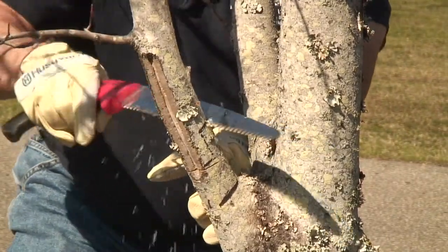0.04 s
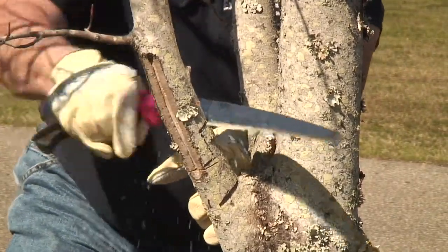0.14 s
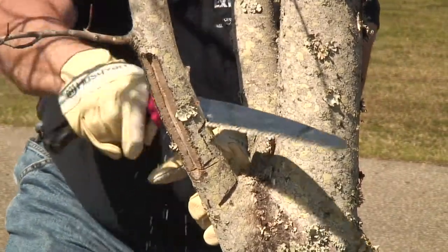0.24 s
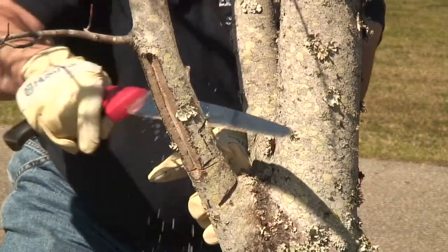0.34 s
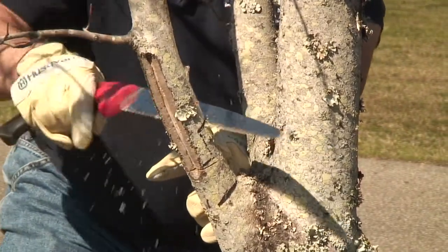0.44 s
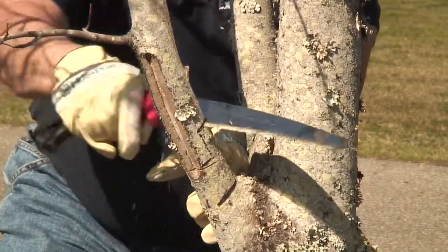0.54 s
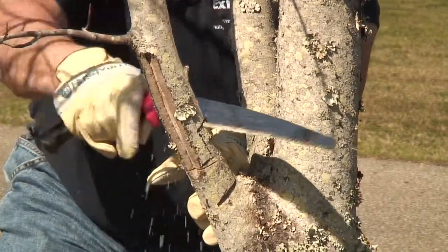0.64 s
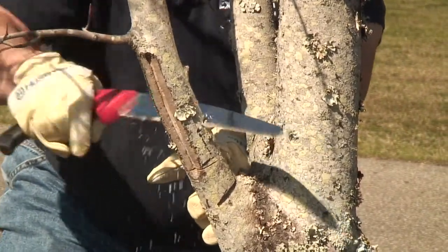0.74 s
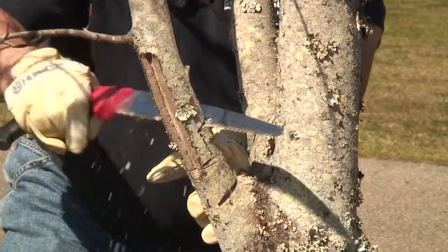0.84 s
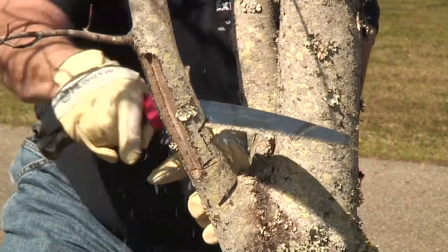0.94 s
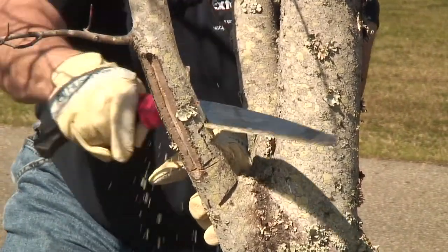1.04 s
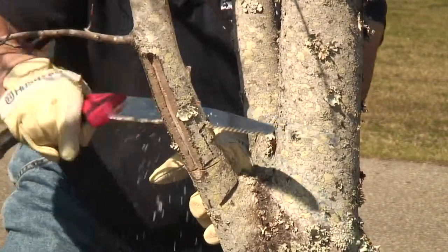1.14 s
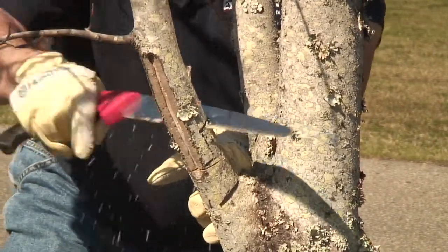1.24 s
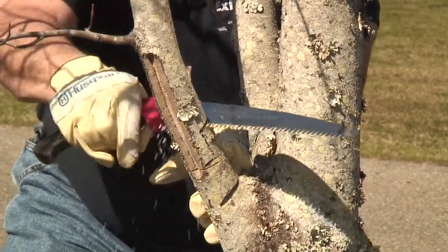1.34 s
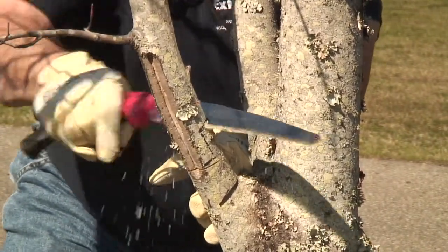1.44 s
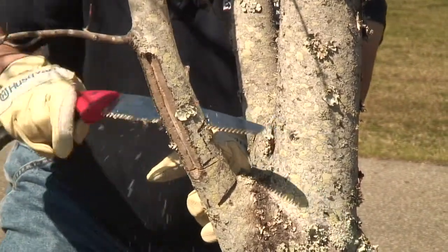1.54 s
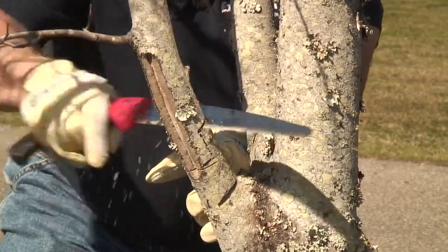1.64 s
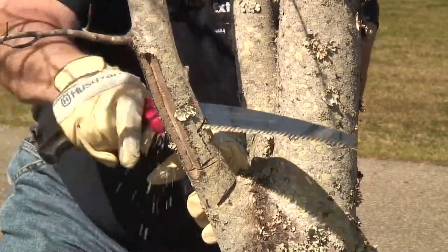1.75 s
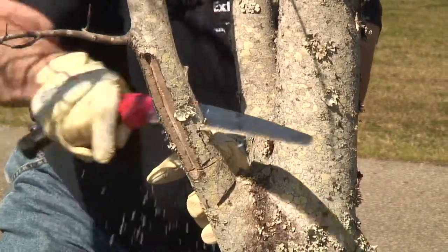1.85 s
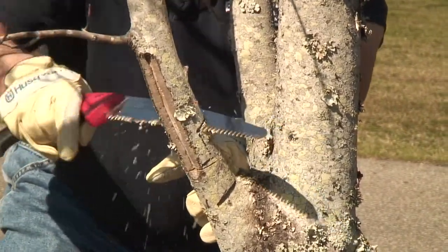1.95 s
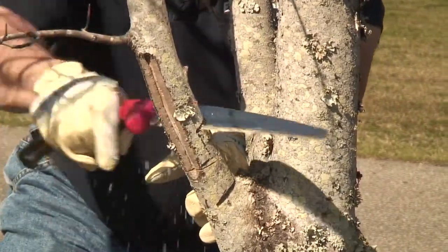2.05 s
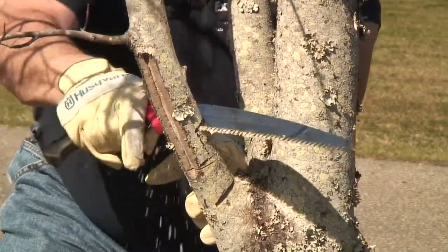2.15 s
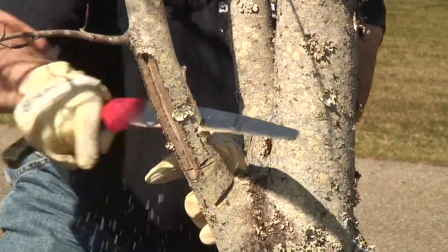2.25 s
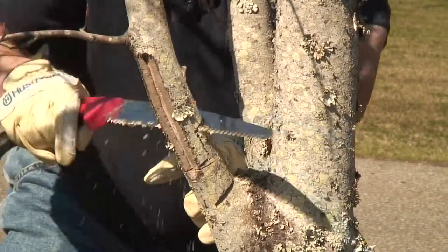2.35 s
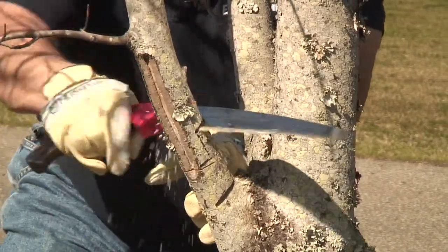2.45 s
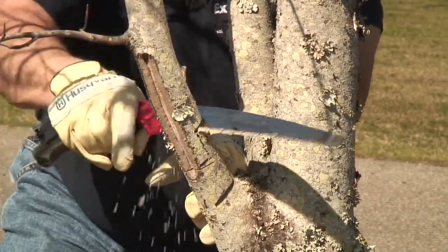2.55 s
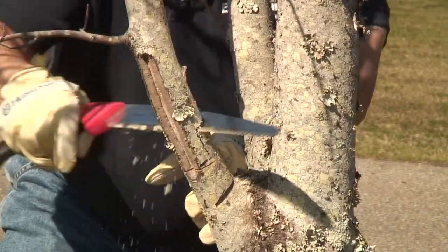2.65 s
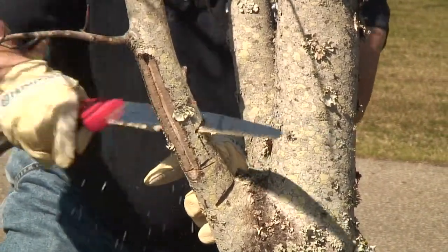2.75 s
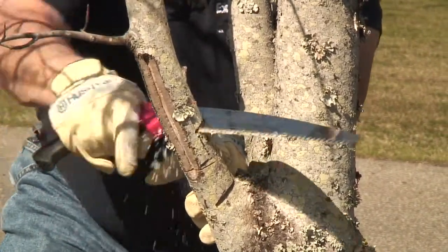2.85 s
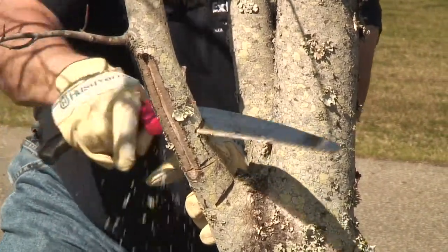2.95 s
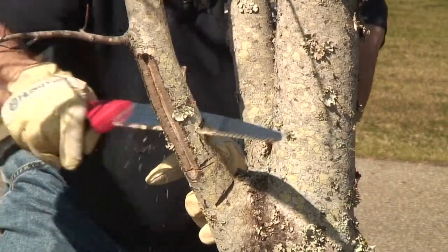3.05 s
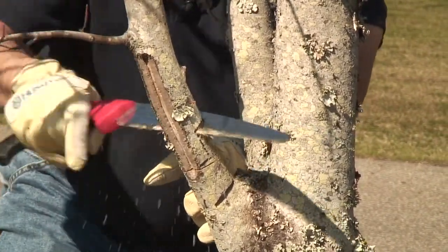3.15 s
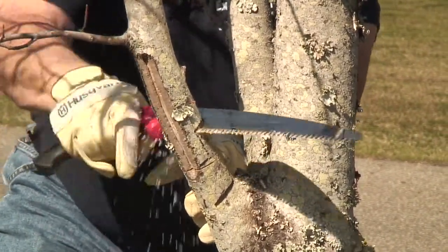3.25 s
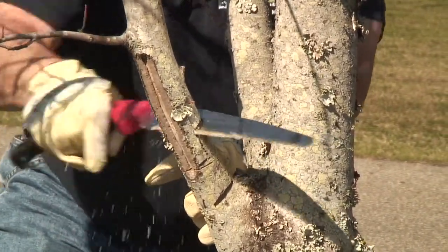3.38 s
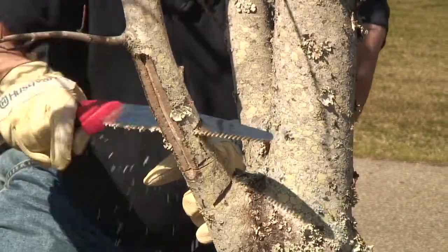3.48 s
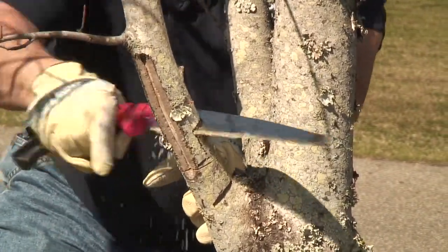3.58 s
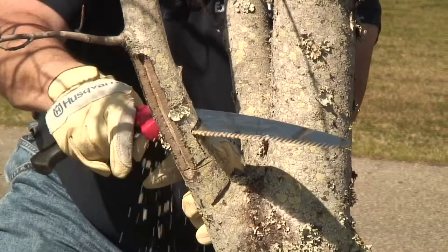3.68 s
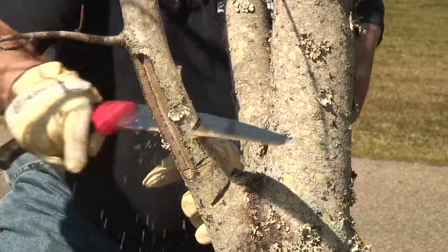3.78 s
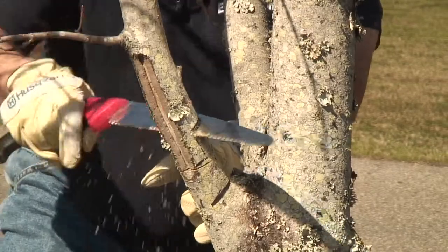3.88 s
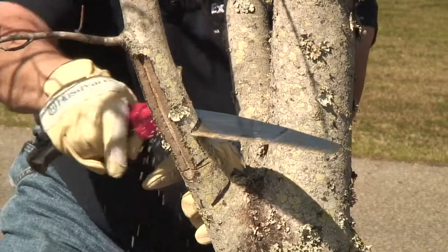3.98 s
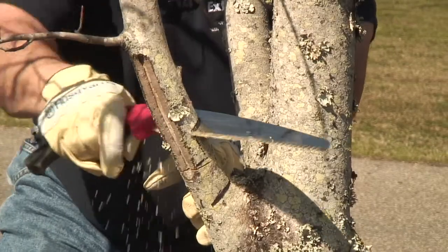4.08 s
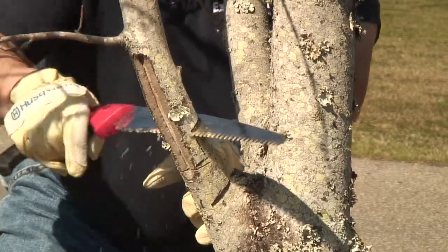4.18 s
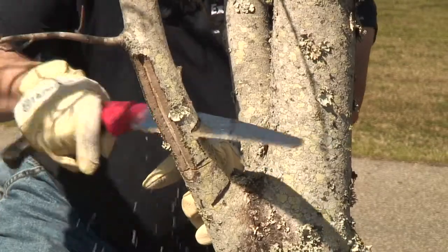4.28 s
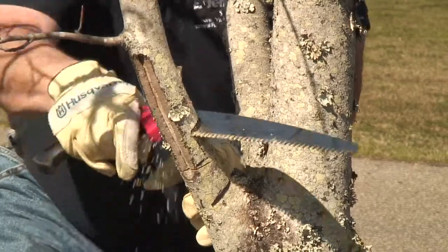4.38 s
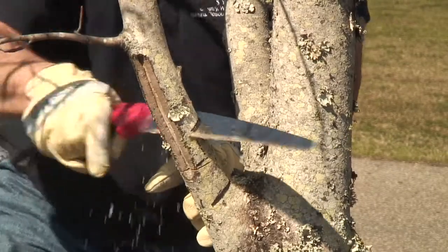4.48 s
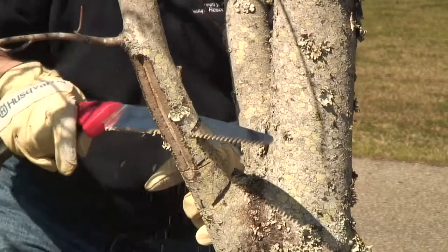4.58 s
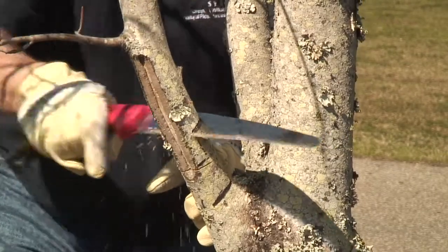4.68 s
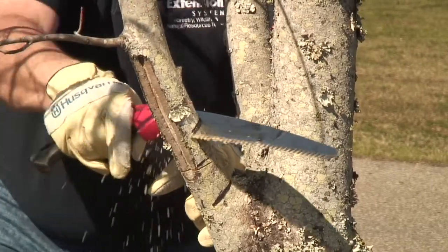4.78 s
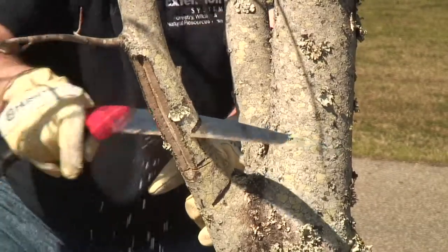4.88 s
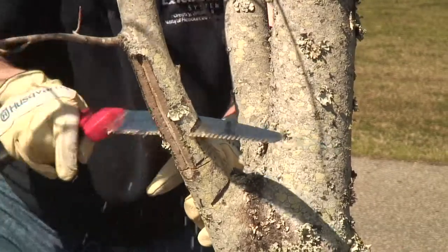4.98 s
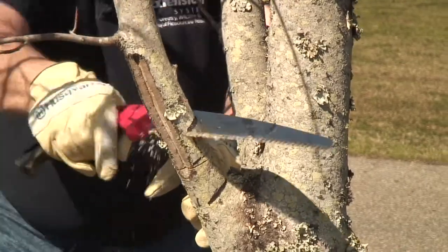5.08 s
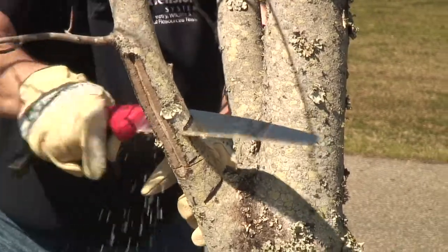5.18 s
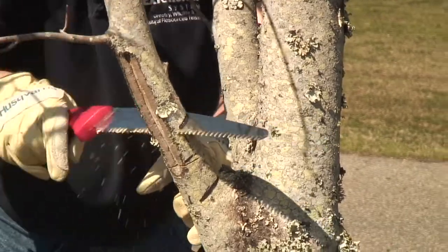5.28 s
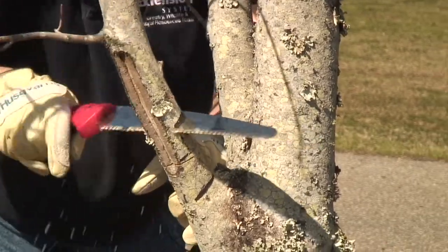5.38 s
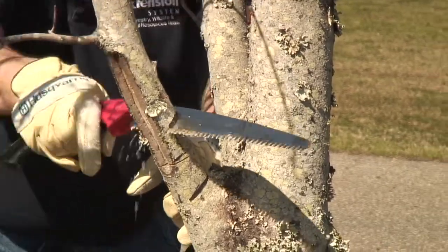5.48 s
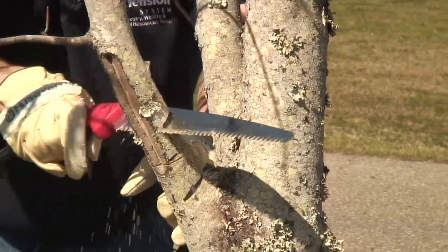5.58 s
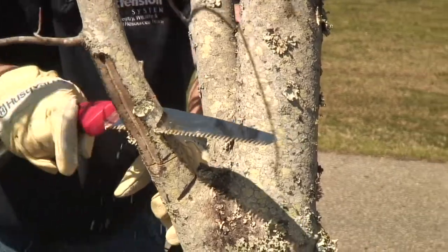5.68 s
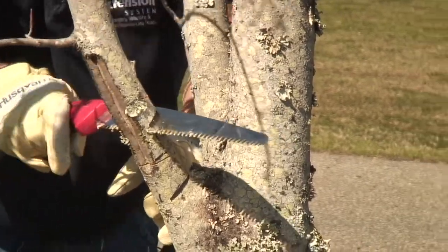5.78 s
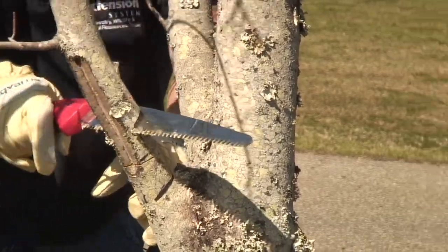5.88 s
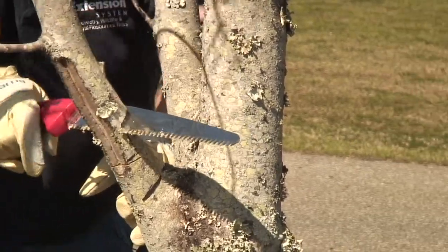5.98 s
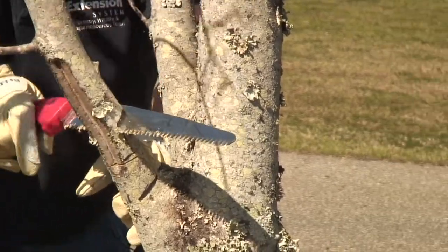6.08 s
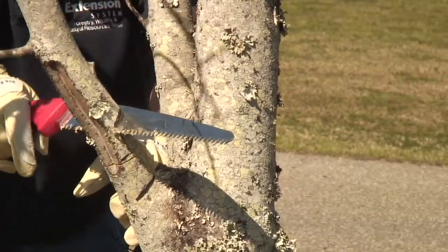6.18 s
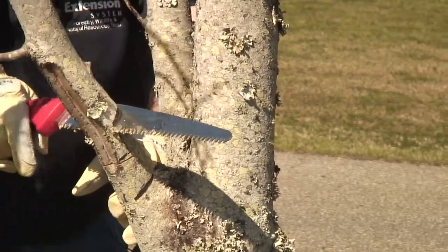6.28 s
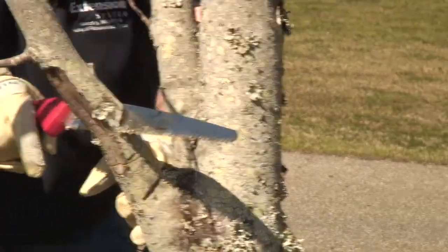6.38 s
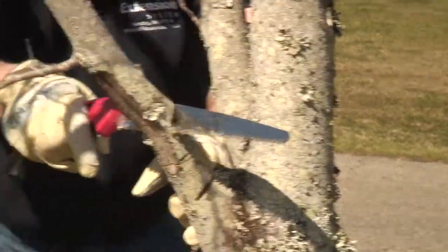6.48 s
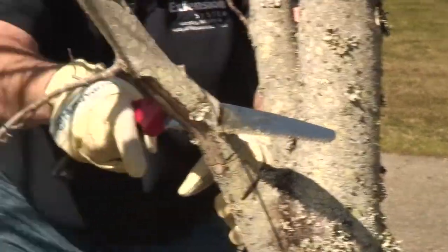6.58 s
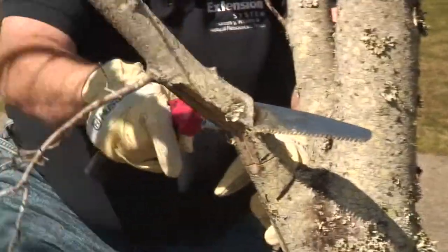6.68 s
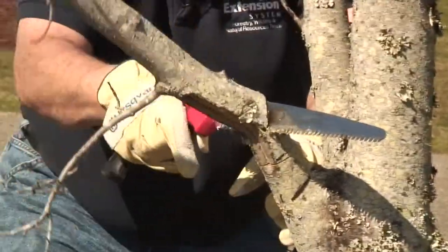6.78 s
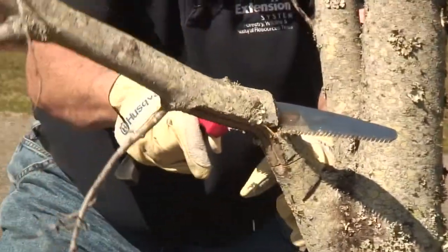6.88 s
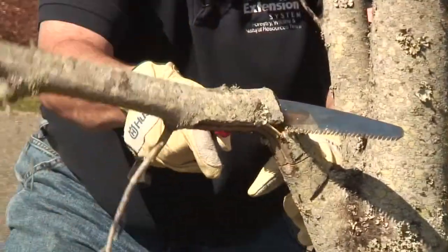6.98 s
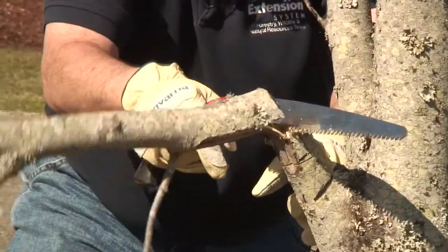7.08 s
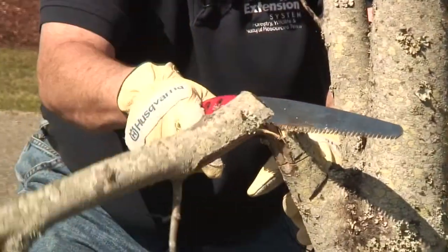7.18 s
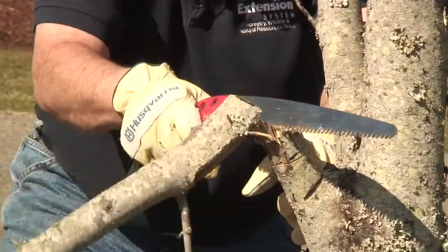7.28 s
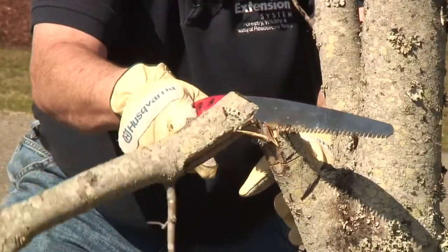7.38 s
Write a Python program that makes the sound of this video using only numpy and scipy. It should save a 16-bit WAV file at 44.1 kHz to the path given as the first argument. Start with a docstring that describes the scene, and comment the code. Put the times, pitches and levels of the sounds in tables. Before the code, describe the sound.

A pruning saw cuts through a live branch outdoors, close to the microphone. Quick, even strokes alternate between louder pulls and lighter pushes, mixing a hollow wooden buzz with a bright steel rasp and a few short whistles and squeaks. The sawing stops. After a brief pause, fibres snap sharply one after another, the wood crackles as it tears, and twigs rustle as the limb drops. Faint open air lies underneath.

```python
"""A pruning saw cuts a live branch close by, outdoors: loud pull strokes, lighter pushes.
Its teeth drum on the wood and rasp the steel blade, which rings, whistles and snags in the kerf.
After a pause the last thick fibres snap one by one, the hinge of uncut wood crackles as it tears,
and the limb swings down with a rustle. Quiet open air lies under it all."""
import sys
import numpy as np
from scipy import signal
from scipy.fft import rfft, irfft, next_fast_len
from scipy.io import wavfile
from scipy.ndimage import uniform_filter1d

SR = 44100
rng = np.random.default_rng(int(sys.argv[2]) if len(sys.argv) > 2 else 0)


def bounce(signal):
    """Save signal as a 16-bit WAV file at the path given by the first command-line argument."""
    frames = np.transpose(np.atleast_2d(signal))
    limited = np.clip(frames, -1, 1)
    pcm = np.round(limited * 32767).astype(np.int16)
    wavfile.write(sys.argv[1], SR, pcm)


N = 327663
T = np.arange(N) / SR
TOP_HZ = 15900


def undb(db):
    """Decibels to gain."""
    return 10 ** (np.asarray(db) / 20)


def unit(x):
    """Scale to rms 1."""
    return x / np.sqrt(np.mean(x ** 2))


def noise():
    """White noise of full length."""
    return rng.standard_normal(N)


def colour(x, points):
    """EQ by a curve of (frequency [Hz], level [dB]) points; rms 1."""
    hz, db = np.transpose(points)
    half = next_fast_len(N // 2 + 1)
    gain = undb(np.interp(np.log(np.linspace(1, SR / 2, half + 1)), np.log(hz), db))
    return unit(irfft(rfft(x, 2 * half) * gain)[:N])


def lowpass(x, hz, order=1):
    """Roll off the highs."""
    return signal.sosfilt(signal.butter(order, hz, fs=SR, output="sos"), x)


def ring(x, hz, width_hz):
    """One resonance, gain 1 at its centre."""
    return signal.lfilter(*signal.iirpeak(hz, hz / width_hz, fs=SR), x)


def bell_eq(x, hz, width_hz, db):
    """Boost or cut one resonance by a level that may move."""
    return x + (undb(db) - 1) * ring(x, hz, width_hz)


def sing(hz, half_width_hz, drive):
    """A driven resonance whose centre may drift: narrow noise riding a pitch curve."""
    quiver = lowpass((noise() + 1j * noise()) * drive, half_width_hz, order=2)
    return unit(np.real(quiver * np.exp(2j * np.pi * np.cumsum(hz) / SR)))


def walk(rate):
    """Random levels held 1 / rate s and slewed; rms 1."""
    hold = int(SR / rate)
    return unit(uniform_filter1d(noise()[np.arange(N) // hold], hold))


def arch(start, top, end):
    """A half-sine swell that peaks at the given time."""
    return np.sin(np.pi * np.interp(T, [start, top, end], [0, .5, 1])).clip(0)


# pull and push in turn, each lasting until the next: (start [s], fastest point [share], force [dB])
HAND_STROKES = [(-.046, 0.44, -35.5), (.104, 0.59, -36), (.283, 0.69, -33.5), (.492, 0.57, -38),
                (.673, 0.58, -34), (.885, 0.59, -37.5), (1.068, 0.56, -33), (1.267, 0.6, -37),
                (1.442, 0.67, -33), (1.642, 0.58, -36.5), (1.824, 0.66, -34.5), (2.036, 0.56, -37),
                (2.207, 0.55, -34.5), (2.418, 0.44, -37.5), (2.586, 0.63, -34.5), (2.784, 0.46, -38),
                (2.978, 0.69, -33.5), (3.181, 0.53, -37.5), (3.358, 0.66, -33.5), (3.563, 0.53, -37),
                (3.739, 0.63, -34.5), (3.925, .64, -39), (4.106, 0.51, -37.5), (4.313, 0.51, -37.5),
                (4.48, .4, -31.5), (4.678, 0.57, -37), (4.834, 0.58, -33), (5.025, 0.68, -38),
                (5.207, .53, -33.5), (5.392, 0.74, -40.5), (5.581, 0.45, -47.5)]
def hand(pulling, stop_s=5.741):
    """Strokes in one direction: speed, progress through the stroke, and envelopes for wood and steel."""
    grip, power = (.29, 1.25) if pulling else (.13, 1.48)
    speed, place, bite, rasp = np.zeros((4, N))
    ends = [row[0] for row in HAND_STROKES[1:]] + [stop_s]
    strokes = list(zip(HAND_STROKES, ends, rng.standard_normal(len(ends))))
    for (start, fastest, force_db), end, haste in strokes[0::2] if pulling else strokes[1::2]:
        swing = arch(start, start + fastest * (end - start), end)
        speed += swing * undb(1.4 * haste)
        place += np.interp(T, [start, end], [0, 1], right=0)
        bite += undb(force_db) * swing ** 1.4
        # the teeth skate at low speed and dig in past the grip threshold
        dig = .2 + .8 * swing ** 6 / (swing ** 6 + grip ** 6)
        rasp += undb(force_db) * swing ** power * dig
    return speed, place, bite, rasp


def teeth(pulling, speed, scatter_db=2.5):
    """Each tooth knocks and tears a burst of fibres: ragged on the pull, an even buzz on the push."""
    tooth_hz, jitter = (279.2, .06) if pulling else (357.5, .04)
    passed = np.cumsum(tooth_hz * speed ** .4 * (1 + jitter * walk(300))) / SR
    tooth, phase = passed.astype(int), passed % 1
    pulses = np.diff(tooth, prepend=0) * undb(scatter_db * noise()[tooth])
    toughness = undb(2 * walk(300))
    tearing = 1 + 1.1 * np.exp(-phase / 1.15) * toughness
    return pulses, tearing


def flex(x, place, near_ms, travel_ms, echo):
    """A bending wave returns from the blade's end; its delay follows the free length of steel."""
    delay_s = (near_ms + travel_ms * place) * (1 + .15 * walk(4)) / 1000
    return unit(x + echo * np.interp(T - delay_s, T, x))


# body of the branch under pulled and pushed teeth: (frequency [Hz], level [dB])
PULL_BODY = [(130, -41), (290, -15), (450, -9), (620, -0.5), (800, 3.5), (1100, 0), (1350, -4.5),
             (1700, -9.5), (2300, -8.5), (3200, -21.5)]
PUSH_BODY = [(130, -35), (320, -9.5), (450, -6), (640, -1), (850, -2), (1090, 5), (1400, -2), (1800, -4.5),
             (2300, -15), (3200, -24)]
def branch(pulling, speed, place, pulses, tearing):
    """The wood drums under the teeth, with a groan, a low knock and a hollow note."""
    body, tooth_db, groan_hz, groan_db = (PULL_BODY, -1, 790, -8) if pulling else (PUSH_BODY, 1, 1071, -6)
    drumming = colour(pulses, body) * np.sqrt(np.mean(speed > .1))
    wood = undb(tooth_db) * drumming + colour(noise() * tearing, body)
    wood = flex(wood, place, near_ms=2, travel_ms=1, echo=.25)
    # drawing the blade out sinks the groan's pitch and brings up the knock
    drawn = place - .5 if pulling else .5 - place
    groan = sing(groan_hz - 260 * drawn + 45 * walk(6), half_width_hz=54, drive=tearing)
    knock_db = 18 * drawn
    # groan and hollow note fade as the kerf deepens
    wood += undb(groan_db - .5 * T) * groan
    hollow_db = 2.5 - T - 4.5 * drawn
    wood = bell_eq(wood, hz=310, width_hz=105, db=knock_db)
    return bell_eq(wood, hz=1330, width_hz=540, db=hollow_db)


# rasp of steel in the kerf: (frequency [Hz], level [dB])
STEEL_RASP = [(1500, -18), (2600, -2.5), (3300, 1), (4200, -2.5), (5300, 2.5), (6500, -6.5), (7400, -6),
              (8800, 0.5), (10400, -1), (11500, -9), (13000, -9), (15500, -26)]
def blade(pulling, speed, place, tearing, ring_hz, ring_db, sheen_db):
    """The steel scrapes and rings as the kerf pinches it; a looser sheen on top grows with speed."""
    pinch, sheen_trim_db, tilt_db_per_octave = (1.2, -6.5, 1) if pulling else (.12, -16, -1)
    ringing = sing(ring_hz + 55 * walk(12), half_width_hz=302, drive=tearing)
    ringing *= undb(1 + pinch * ring_db)
    sheen = sing(10100 + 350 * walk(7), half_width_hz=850, drive=tearing)
    sheen *= speed * undb(sheen_db + sheen_trim_db + .5 * walk(12))
    tilted = [(hz, db + tilt_db_per_octave * np.log2(hz / 6000)) for hz, db in STEEL_RASP]
    scrape = colour(noise() * tearing, tilted)
    return flex(scrape + ringing + sheen, place, near_ms=.6, travel_ms=.5, echo=.3)


# as the kerf deepens the blade's ring sinks, its sheen swells and ebbs, and the wood finally eases off:
# (time [s], ring pitch [Hz], ring level [dB], sheen level [dB], wood level [dB])
KERF_CURVES = [(0, 6295, 1, -5, -2), (1.299, 6210, -1.5, -6, 0), (2.3, 6280, -3.5, 3, 1),
               (3.3, 6227, -.5, 2, 0.5), (4.2, 6220, 2, 8, 0.5), (4.599, 6140, 1, 2.5, -1),
               (5.299, 6070, 0.5, 1, -1.5), (5.698, 6000, 1, -8, -4)]
def saw(pulling):
    """All pulls or all pushes: the hand drives the teeth, and the teeth excite wood and steel."""
    wood_trim_db, steel_trim_db, catch_db = (-4, 0, .78) if pulling else (-3, .25, .83)
    times, *curves = np.transpose(KERF_CURVES)
    ring_hz, ring_db, sheen_db, wood_db = (np.interp(T, times, curve) for curve in curves)
    speed, place, bite, rasp = hand(pulling)
    pulses, tearing = teeth(pulling, speed)
    wood = branch(pulling, speed, place, pulses, tearing)
    steel = blade(pulling, speed, place, tearing, ring_hz, ring_db, sheen_db)
    catching = undb(catch_db * walk(85))  # the teeth catch and slip unevenly
    wood *= bite * undb(wood_trim_db + wood_db + .58 * walk(70))
    steel *= rasp * undb(steel_trim_db + .4 * walk(160))
    return catching * (wood + steel)


# outdoor bed: (frequency [Hz], level [dB])
AIR_BED = [(20, 3), (45, -7.5), (110, -11), (230, -8), (320, -5.5), (430, -5.5), (800, -2), (1300, -8),
           (2000, -11.5), (3500, -12), (7000, -15), (11000, -17.5), (15000, -23)]
def air(level_db=-53.5):
    """Steady open air with a little low rumble."""
    return colour(noise(), AIR_BED) * undb(level_db + .11 * walk(2.9))


# whistles of the blade: (middle [s], top pitch [Hz], level [dB])
BLADE_WHISTLES = [(.29, 1450, -43), (1.19, 1470, -42), (1.675, 1512, -43), (2.085, 1470, -43),
                  (2.606, 1404, -43.5)]
def whistles(length_s=.15, droop_hz=270, waver=.0061):
    """The sliding blade sings near-pure tones, each rising and falling in one arch."""
    out, wobble = np.zeros(N), 1 + waver * walk(250)
    for middle, top_hz, db in BLADE_WHISTLES:
        along = np.clip(2 * (T - middle) / length_s, -1, 1)
        hz = (top_hz - droop_hz * along ** 2) * wobble
        out += undb(db) * (1 - along ** 4) * np.sin(2 * np.pi * np.cumsum(hz) / SR)
    return out * undb(2.3 * walk(90))


# snags and creaks in the kerf: (middle [s], length [s], pitch [Hz], level [dB])
KERF_CREAKS = [(0.685, 0.11, 2750, -53), (1.341, 0.027, 700, -37.5), (2.028, 0.047, 1730, -51),
               (3.231, 0.054, 310, -46), (3.239, 0.037, 577, -41), (3.267, 0.066, 1270, -37.5),
               (4.47, 0.045, 2220, -41), (5.029, 0.074, 1880, -45.5), (5.29, .11, 3470, -45),
               (5.316, 0.039, 780, -37), (7.24, .011, 3140, -43), (7.405, 0.029, 3220, -41.5)]
def creaks(width_share=.37, scuff_db=-11):
    """Short hoarse squeaks and grunts of the pinched blade and the bending wood, each with a dry scuff."""
    out, scuff = np.zeros(N), undb(scuff_db) * colour(noise(), STEEL_RASP)
    for middle, length, hz, db in KERF_CREAKS:
        width_hz = width_share * hz
        squeak = unit(ring(ring(noise(), hz, width_hz), hz, width_hz))
        out += undb(db) * arch(middle - length / 2, middle, middle + length / 2) * (squeak + scuff)
    return out


# thin tones, barely above the air: (start [s], end [s], pitch [Hz], level [dB])
THIN_TONES = [(6.02, 6.3, 2460, -70), (6.37, 6.51, 2460, -66), (6.978, 7.04, 6850, -56)]
def faint_tones(half_width_hz=18):
    """Thin whistles swell and fade at a steady pitch."""
    return sum(undb(db) * arch(start, (start + end) / 2, end) * sing(np.full(N, hz), half_width_hz, 1)
               for start, end, hz, db in THIN_TONES)


# resonances of split wood: (frequency [Hz], width [Hz], level [dB])
SPLINTER_MODES = [(440, 200, -14.5), (1400, 530, -12.5), (2720, 79, -22), (3920, 530, 7), (5740, 1200, 1.5),
                  (6660, 640, 3.5), (9000, 1200, 4.5), (10930, 840, -0.5), (11800, 2000, -16)]
def splinter(x):
    """The split wood rings in answer to a fracture."""
    return sum(undb(db) * ring(x, hz, width_hz) for hz, width_hz, db in SPLINTER_MODES)


# thick fibres breaking: (time [s], level before trim [dB], strongest frequency [Hz])
FIBRE_SNAPS = [(6.3603, -46.5, 3870), (6.4993, -20, 3300), (6.5746, -36, 3670), (6.5996, -39, 3980),
               (6.614, -25, 3700), (6.6347, -12, 9800), (6.687, -41.5, 5760), (6.7426, -38.5, 10100),
               (6.8897, -19, 9600), (6.9385, -25, 9100), (7.0829, -31, 3830), (7.0915, -14.5, 8600),
               (7.1023, -33.5, 3850), (7.155, -38.5, 9190), (7.1872, -34, 6810), (7.204, -36, 6760),
               (7.2258, -40, 3330), (7.2695, -24, 6280), (7.313, -37, 3820), (7.3352, -29, 5800),
               (7.358, -35, 4190)]
def snaps(tear_s=.001, tail_s=.0083, tail_db=-27, air_s=.033, air_db=-46, trim_db=3):
    """Each fibre parts in about a millisecond; the limb and the ground scatter a faint tail."""
    out, t = np.zeros(N), T[:SR // 10]
    fade = np.exp(-t / tear_s) + undb(tail_db) * np.exp(-t / tail_s) + undb(air_db) * np.exp(-t / air_s)
    for time, db, hz in FIBRE_SNAPS:
        grain = np.sign(rng.standard_normal(len(t)))
        crack = splinter(grain * fade)
        # every fibre has a pitch of its own, and thick low ones part more dully
        crack += undb(1) * ring(crack, hz, width_hz=.49 * hz)
        crack = lowpass(crack, min(1.52 * hz, TOP_HZ))
        loudest = np.sqrt(uniform_filter1d(crack ** 2, SR // 500).max())
        i = int(time * SR)
        out[i:i + len(t)] += undb(db + trim_db) * crack[:N - i] / loudest
    return out


# spells of tearing as the limb bends: (start [s], peak [s], end [s], level [dB])
HINGE_TEARS = [(6.52, 6.66, 7.4, -57), (6.77, 6.787, 7.0, -54.5), (7.06, 7.25, 8, -55.5)]
def hinge(ticks_per_s=330, scatter_db=7):
    """Small fibres tick at random in the hinge of uncut wood while it tears."""
    strain = sum(undb(db) * arch(start, peak, end) for start, peak, end, db in HINGE_TEARS)
    ticks = (rng.random(N) < ticks_per_s / SR) * undb(scatter_db * noise().clip(-2, 2))
    crackle = splinter(ticks) + undb(7) * ring(ticks, hz=3750, width_hz=600)
    return strain * unit(lowpass(crackle, hz=11000))


# rustle of twigs: (frequency [Hz], level [dB])
TWIG_RUSTLE = [(800, -24), (2000, -6), (3200, 3.5), (4200, 1), (6000, -1), (9000, -4), (12000, -11),
               (15500, -29)]
# swishes of the falling limb: (time [s], rustle level [dB], brush level [dB])
LIMB_SWISHES = [(7.258, -47, -48), (7.317, -39, -48), (7.41, -47, -66)]
def falling_limb(attack_s=.011, decay_s=.034, grit_db=3):
    """Twigs rustle and brush as the limb comes down; each swish swells quickly and dies away."""
    twigs = colour(noise() * undb(grit_db * walk(910)), TWIG_RUSTLE)
    brush = colour(noise(), [(150, -38), (330, -9), (650, 5), (1000, -3), (2000, -14), (4000, -38)])
    out = np.zeros(N)
    for time, rustle_db, brush_db in LIMB_SWISHES:
        swell = np.exp(np.minimum((T - time) / attack_s, (time - T) / decay_s))
        out += swell * (undb(rustle_db) * twigs + undb(brush_db) * brush)
    return out


def scene():
    """The sawing, then the break, over open air; all dead centre."""
    sawing = saw(pulling=True) + saw(pulling=False) + whistles() + creaks()
    mix = sawing + faint_tones() + snaps() + hinge() + falling_limb() + air()
    return np.tile(mix, (2, 1))


def record(dry):
    """Soft saturation rounds the sharpest peaks; a steep low-pass cuts the top."""
    rounded = .83 * np.tanh(dry / .86)
    return signal.sosfilt(signal.ellip(8, .2, 70, TOP_HZ, fs=SR, output="sos"), rounded)


dry = scene()
out = record(dry)
bounce(out)
```